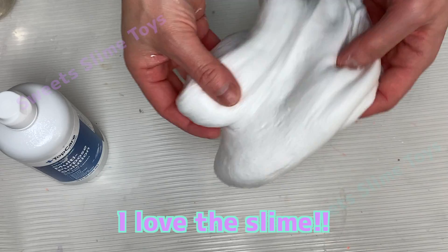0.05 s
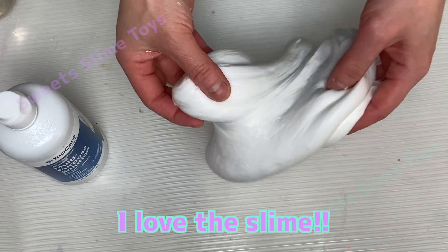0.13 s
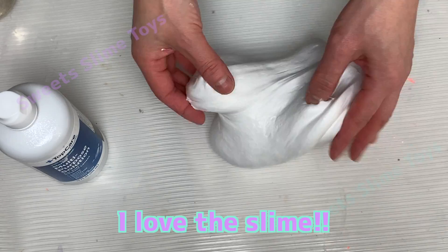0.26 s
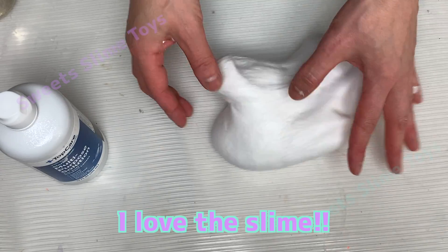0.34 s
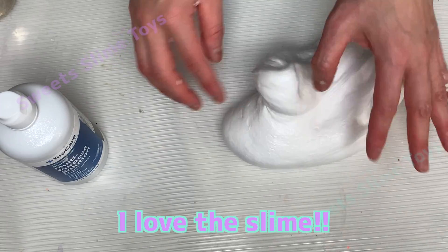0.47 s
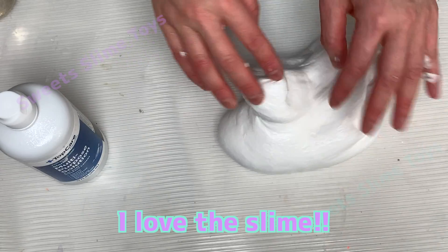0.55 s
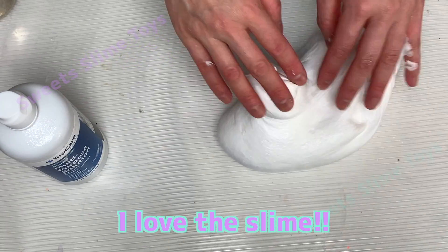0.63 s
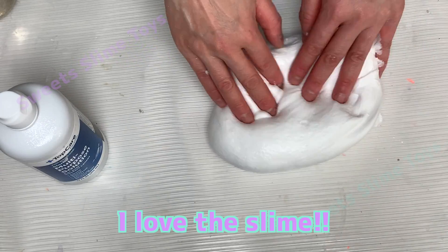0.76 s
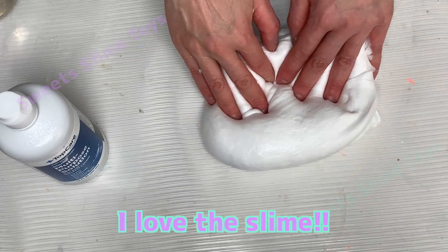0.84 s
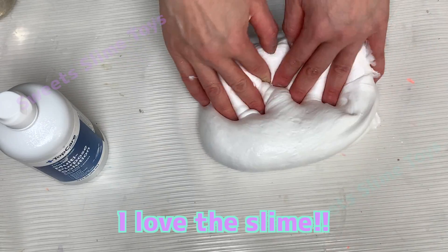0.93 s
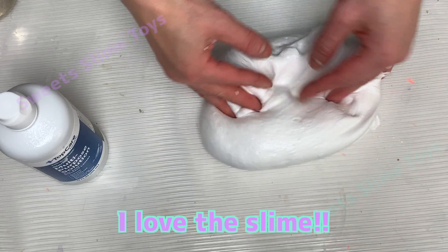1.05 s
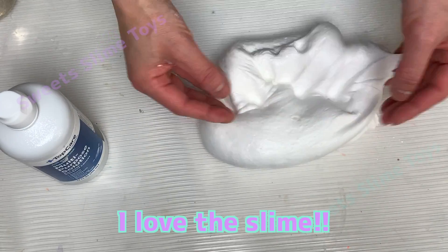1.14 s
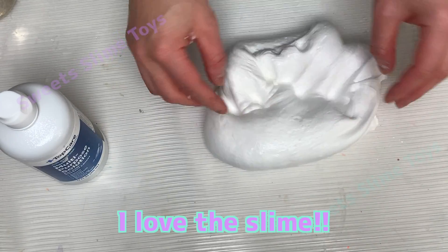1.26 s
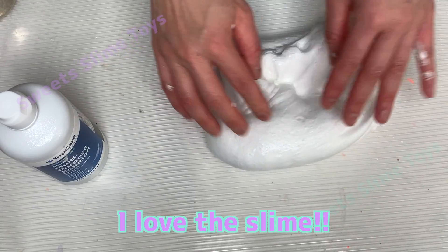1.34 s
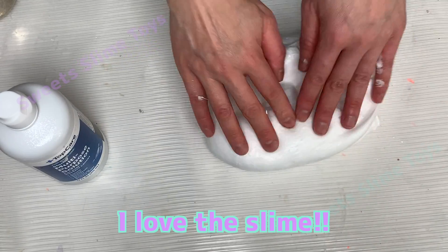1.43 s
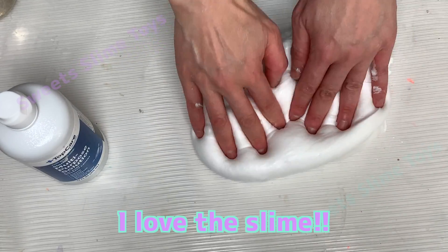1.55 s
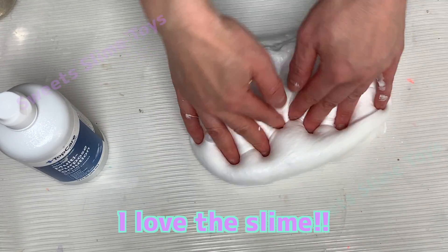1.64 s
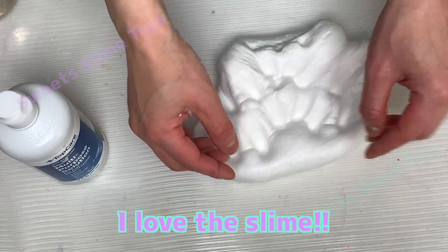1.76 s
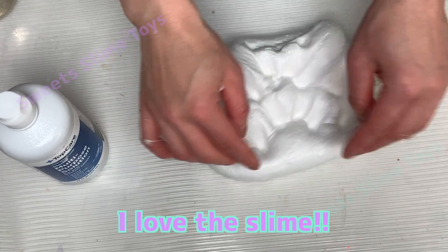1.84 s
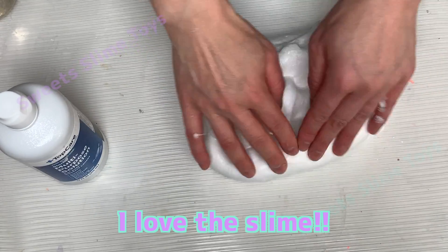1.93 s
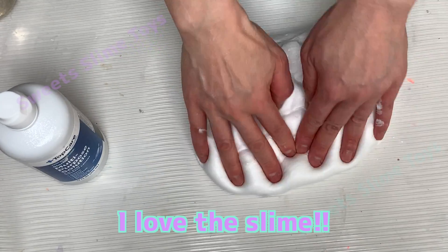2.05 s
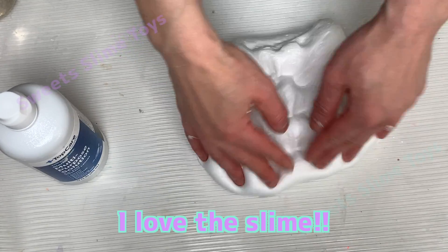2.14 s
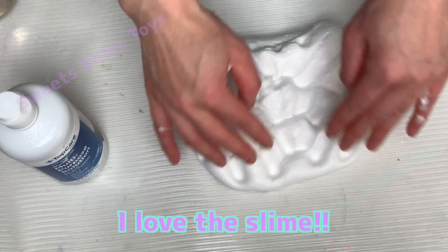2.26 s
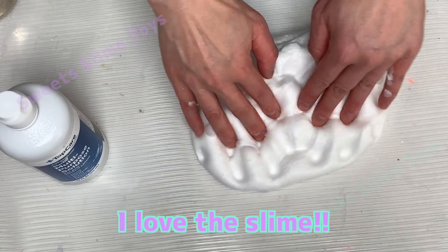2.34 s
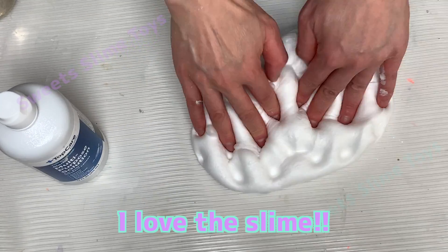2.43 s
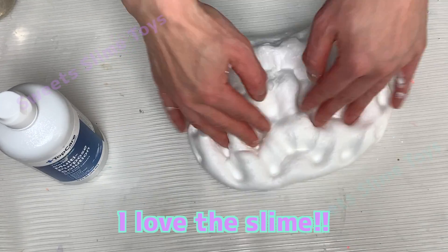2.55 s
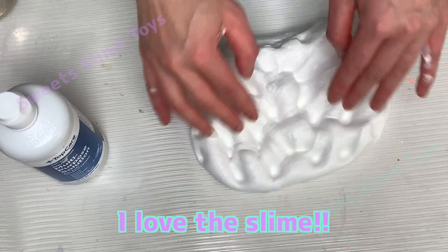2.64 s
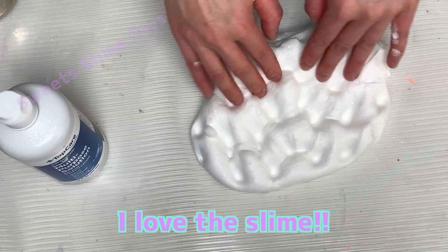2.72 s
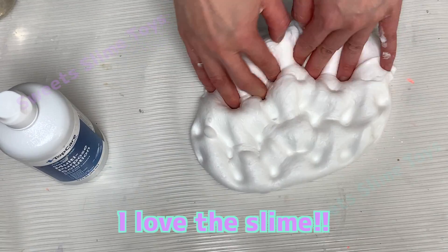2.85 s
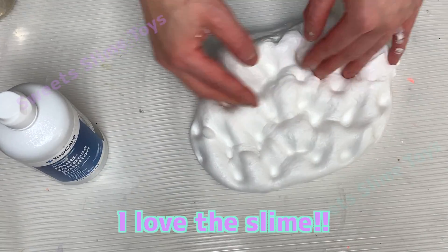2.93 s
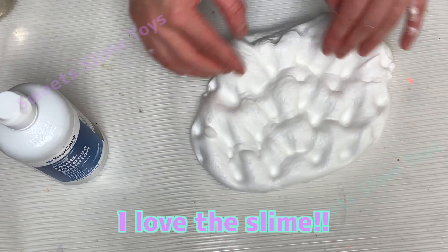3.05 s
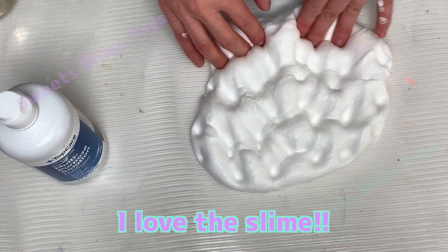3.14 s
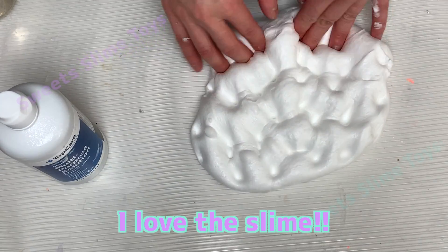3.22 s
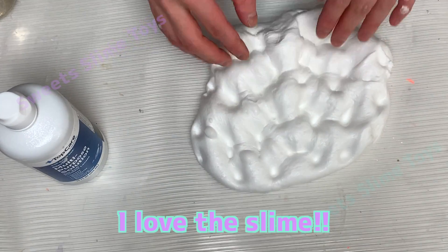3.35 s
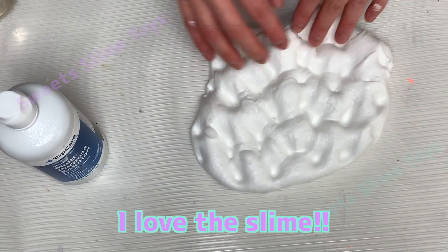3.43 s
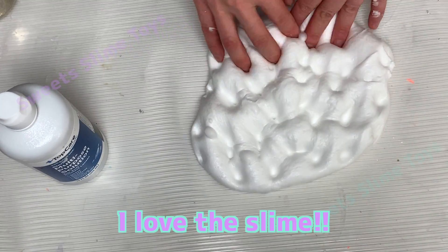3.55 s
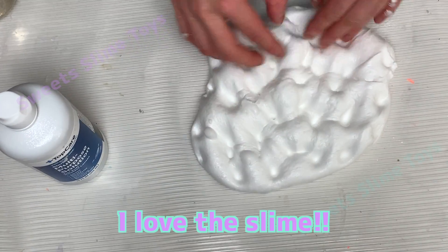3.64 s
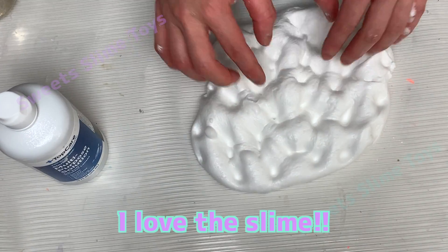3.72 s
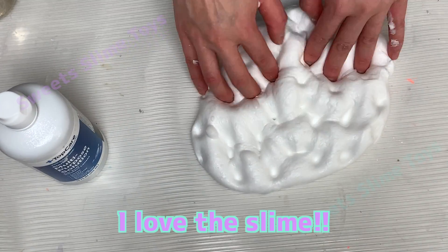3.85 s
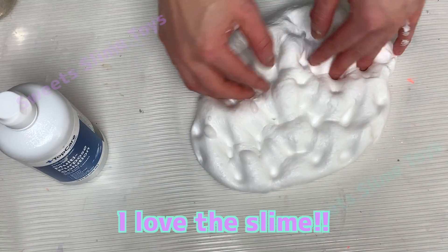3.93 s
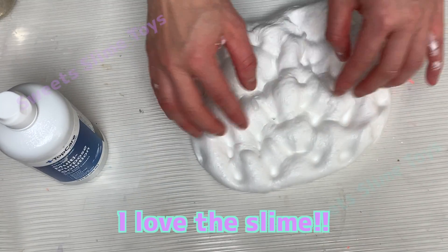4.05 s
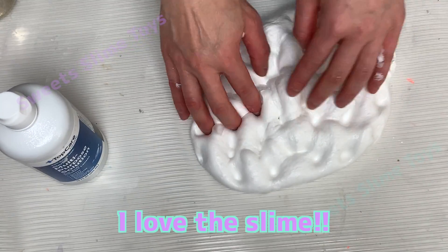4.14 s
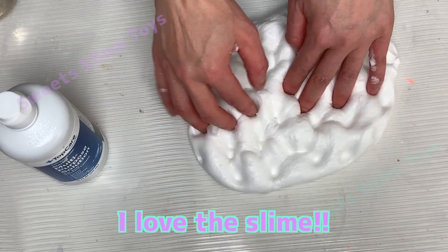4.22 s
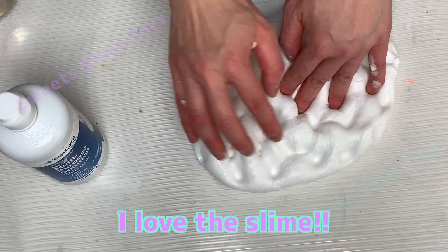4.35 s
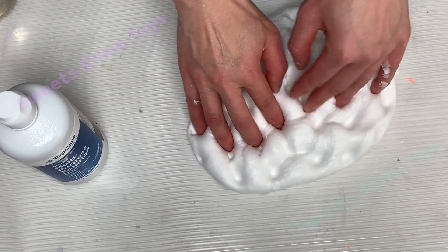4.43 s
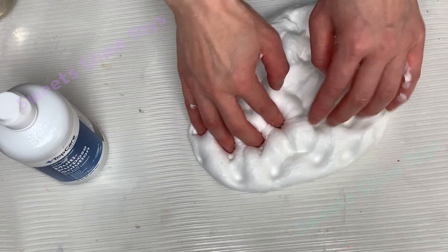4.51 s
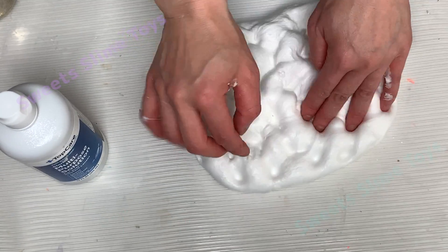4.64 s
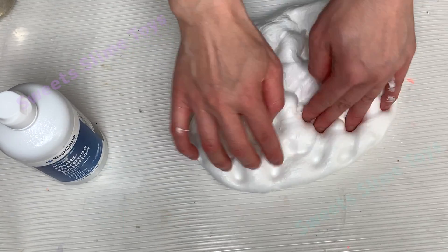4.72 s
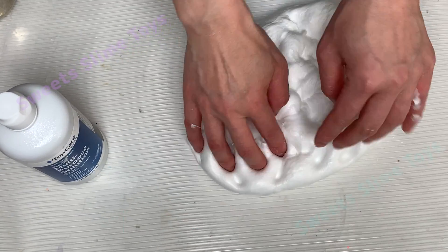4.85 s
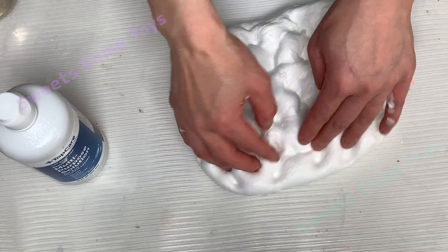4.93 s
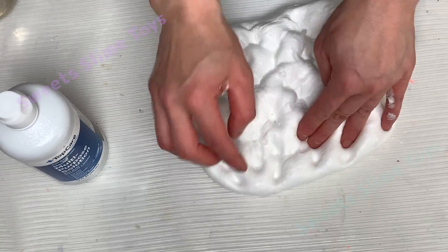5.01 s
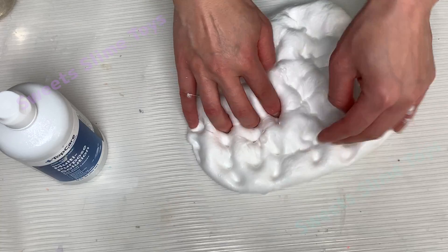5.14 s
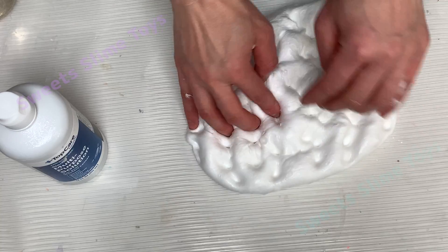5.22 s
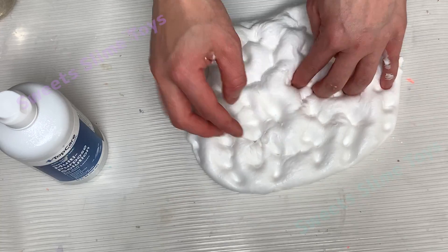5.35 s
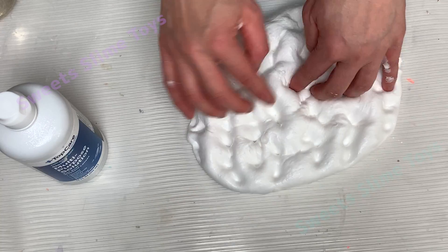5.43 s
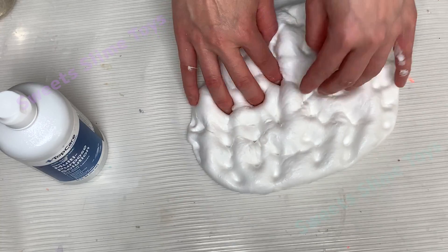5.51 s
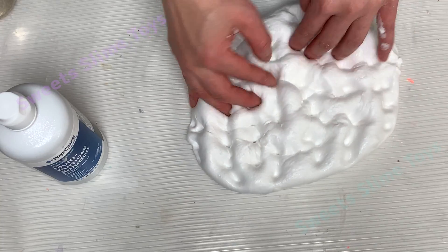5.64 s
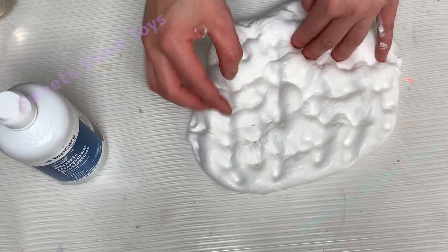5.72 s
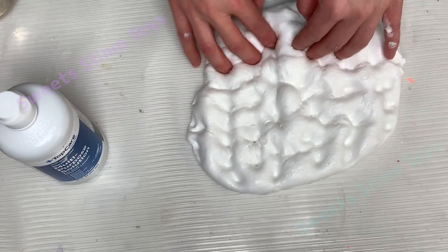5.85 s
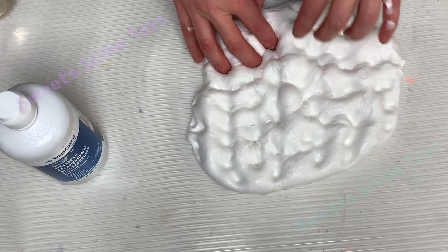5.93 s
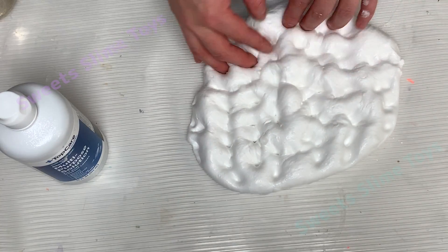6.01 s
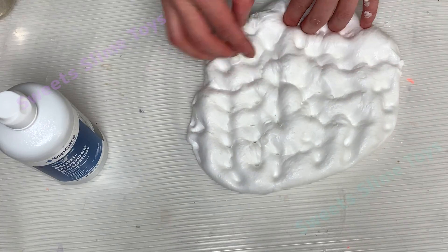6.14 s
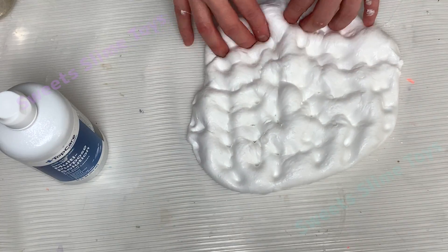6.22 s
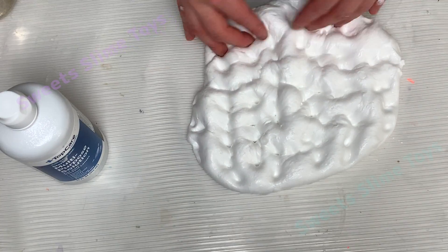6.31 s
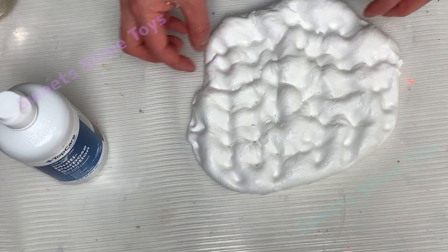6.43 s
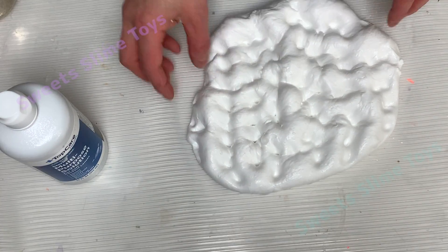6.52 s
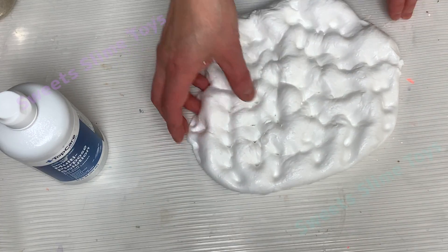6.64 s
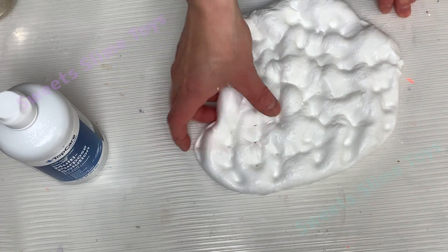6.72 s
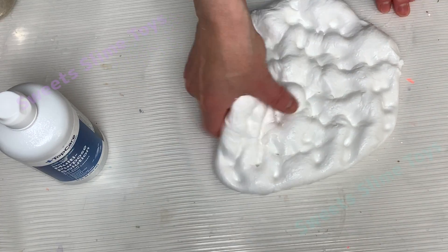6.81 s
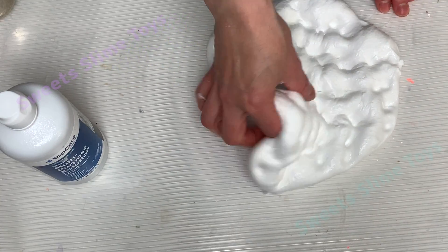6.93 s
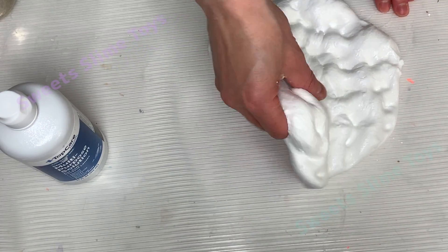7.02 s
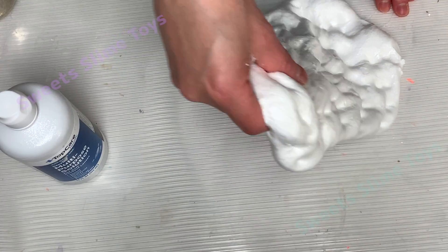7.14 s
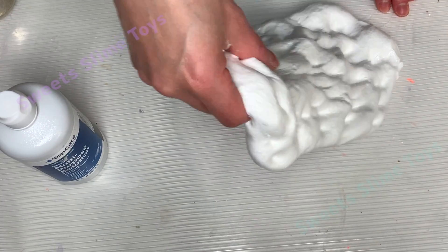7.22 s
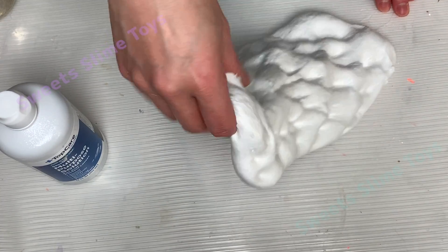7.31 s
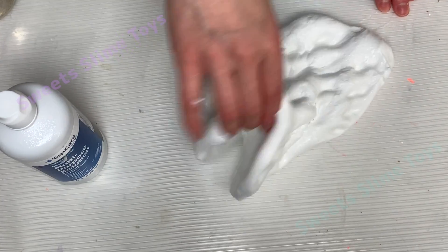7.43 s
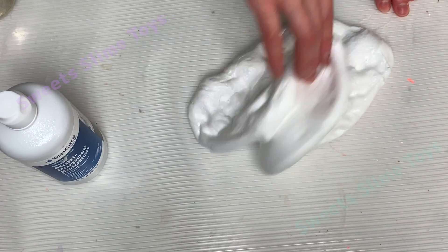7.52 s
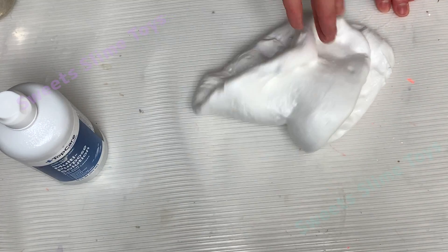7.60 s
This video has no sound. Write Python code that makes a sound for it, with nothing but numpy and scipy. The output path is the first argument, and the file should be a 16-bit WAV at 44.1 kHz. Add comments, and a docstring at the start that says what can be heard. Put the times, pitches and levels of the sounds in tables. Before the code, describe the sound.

Close, nearly mono sound of foam slime being kneaded. Isolated snaps give way to rapid pops and fizzy crackle in uneven pushes with brief quieter gaps, while fingertips knock dully on the table and a small hard object rings faintly now and then. The popping eases near the end into a soft peeling rustle, over faint room hiss.

```python
"""Fingers poke and knead foamy slime on a table in a small quiet room, close to a nearly mono microphone.
It starts with faint crackle and a few soft pops, then single loud ones; from about 2.5 s pops come thick and fast.
Each bursting air pocket is a short swinging snap plus a hollow pock; fine foam crackles as many tiny random bursts.
Pushes thud on the table as a knock and low dying sines, and a small hard object rings faintly on two high notes.
From 6.4 s the slime is peeled off and folded with softer crackle; room echo and filtered-noise hiss run throughout."""
import sys
import numpy as np
from scipy import signal
from scipy.fft import rfft, irfft, next_fast_len
from scipy.io import wavfile
from scipy.ndimage import uniform_filter1d

SR = 44100
rng = np.random.default_rng(int(sys.argv[2]) if len(sys.argv) > 2 else 0)


def master_out(mix):
    """Clip the mix to full scale and print it as 16-bit PCM to the path in sys.argv[1]."""
    frames = np.transpose(np.atleast_2d(mix))
    ceiling = np.clip(frames, -1, 1)
    pcm = np.round(ceiling * 32767).astype(np.int16)
    wavfile.write(sys.argv[1], SR, pcm)


N = 338247  # samples, about 7.7 s


def amp(db):
    """Turns decibels into a plain multiplier."""
    return 10 ** (np.asarray(db) / 20)


def evened(x):
    """Scales a signal to an average (RMS) strength of 1."""
    return x / np.sqrt(np.mean(x ** 2) + 1e-20)


def read(points, hz):
    """Reads a curve between its points, with pitch on a logarithmic scale."""
    point_hz, value = np.transpose(points)
    return np.interp(np.log(hz + 1), np.log(point_hz + 1), value)


def add(mix, start_s, sound):
    """Adds a sound into the mix at a given time."""
    part = mix[max(round(start_s * SR), 0):][:len(sound)]
    part += sound[:len(part)]


def coloured(x, points):
    """Filters by a curve of dB over Hz."""
    size = next_fast_len(len(x))
    gain = amp(read(points, np.fft.rfftfreq(size, 1 / SR)))
    return irfft(rfft(x, size) * gain, size)[:len(x)]


def ringing(modes, count):
    """Struck solids ring as a sum of dying sines; t60 is the time to fall by 60 dB."""
    t = np.arange(count) / SR
    return sum(amp(db - 60 * t / t60) * np.sin(2 * np.pi * hz * t) for hz, db, t60 in modes)


def burst(hz, turns, phase, count=700):
    """A few swings that swell softly and die away; the envelope peaks at 1 after the given turns."""
    swings = np.arange(count) / SR * hz
    envelope = (swings / turns * np.exp(1 - swings / turns)) ** 2.65
    return envelope * np.sin(2 * np.pi * (swings + phase))


# Louder air pockets bursting, levels before the filters.
# Columns: start_s, snap_db, snap_hz, pock_db, pock_hz, and for thick films swings_to_peak (turns)
POPS = [(.1453, -55, 2900, -47.5, 1060), (.152, -47, 5500, -47, 1240), (.236, -42, 3000, -46, 420),
        (.3452, -48, 3000, -45.5, 860), (.356, -44, 3500, -48, 600), (.7767, -8, 6000, -30, 690, .58),
        (0.8198, -32, 4800, -43.5, 570), (.9654, -36.5, 6360, -50, 457), (0.9835, -5, 4080, -17, 696, .66),
        (0.9968, -38.5, 4400, -28, 450), (1.0672, -33, 3360, -38.5, 450, .61),
        (1.196, -44, 4600, -50.5, 400), (1.2069, -45, 2300, -51, 536), (1.491, -31, 5950, -50, 1090),
        (1.6135, -15, 5540, -22.5, 580), (1.628, -38, 4400, -29, 517), (1.65, -29, 4600, -25.5, 655),
        (1.7312, -28.5, 6070, -43, 1030), (1.911, -44, 2900, -42, 527), (1.974, -33.5, 4840, -72, 1530),
        (2, -39, 4830, -74, 630), (2.076, -28, 5660, -31.5, 475), (2.094, -31, 6800, -37, 845),
        (2.136, -30.5, 4080, -33, 1280), (2.2934, -37, 5250, -38.5, 680), (2.3186, -37, 3400, -36.5, 640),
        (2.4804, -6, 5200, -18, 740), (2.4893, -17.5, 3600, -21.5, 745), (2.5026, -13, 2870, -11.5, 780),
        (2.5211, -16.5, 4160, -23, 1130, .42), (2.5696, -22, 6040, -50, 1080),
        (2.578, -19, 6800, -42, 765, .77), (2.701, -47, 4470, -39.5, 517), (2.7159, -27.5, 6340, -51, 680),
        (2.8491, -15.5, 4300, -20, 547, .4), (2.8651, -16.5, 5770, -15.5, 670),
        (2.88, -30, 2700, -24.5, 460), (2.898, -27, 3700, -24, 617), (2.935, -25.5, 5000, -38, 656),
        (2.9471, -26.5, 2720, -42, 670), (3.0771, -25, 4350, -37, 1380), (3.0989, -29.5, 8050, -47.5, 1220),
        (3.1918, -47, 2880, -40, 1470), (3.2448, -25, 4060, -19.5, 490), (3.253, -12, 3260, -14.5, 1350),
        (3.2553, -40, 2700, -23, 640), (3.2796, -16, 5460, -22.5, 610), (3.292, -18.5, 3330, -49, 600),
        (3.3381, -27, 7500, -31.5, 880), (3.3424, -20.5, 6800, -35, 840), (3.362, -28, 3300, -34, 1530),
        (3.4449, -25, 2650, -41, 840), (3.4549, -32, 4500, -34.5, 420), (3.5298, -35.5, 3130, -49, 720),
        (3.5643, -21.5, 6040, -23, 680), (3.5883, -26, 2220, -26, 570), (3.6358, -32.5, 3660, -36, 900),
        (3.7541, -22, 5770, -37, 536), (3.7699, -41, 2210, -36, 1190), (3.8121, -37, 4330, -57, 580),
        (3.869, -30, 4960, -36, 530), (3.8914, -15.5, 4760, -24.5, 690), (3.921, -27, 2500, -24, 610, .45),
        (3.9437, -26, 6440, -23, 630), (3.996, -22, 3130, -61, 680), (4.0557, -37, 4400, -36, 925),
        (4.062, -37, 2340, -33.5, 470), (4.2017, -23, 7840, -18.5, 670), (4.226, -19.5, 2480, -38, 680),
        (4.2377, -15, 8650, -19.5, 740), (4.2698, -26, 8000, -37, 580), (4.289, -29, 5530, -49, 990),
        (4.3611, -38, 3200, -33.5, 1110), (4.3877, -5.5, 5560, -32, 507), (4.3911, -10.5, 2880, -27.5, 710),
        (4.3954, -18, 3000, -18.5, 680), (4.4124, -20, 3200, -23.5, 800), (4.4688, -22, 2900, -56, 780),
        (4.516, -12, 5000, -32, 690, .43), (4.542, -5, 6000, -18.5, 880), (4.5435, -10.5, 4420, -26, 1090),
        (4.558, -49, 5400, -29, 1110), (4.5723, -25, 5700, -35, 1170), (4.576, -9.5, 3700, -13.5, 1000),
        (4.5797, -41, 2400, -25.5, 940), (4.7121, -39, 4300, -41, 677), (4.737, -26, 6400, -31.5, 605),
        (4.755, -33, 3100, -31.5, 635), (4.7685, -27.5, 3780, -35.5, 700), (4.8158, -26.5, 3080, -50, 1130),
        (4.8905, -14.5, 3880, -16.5, 855), (4.899, -18, 2500, -34.5, 900),
        (4.9144, -7.5, 6200, -13.5, 1210), (4.9154, -9, 2830, -24, 1080),
        (4.9402, -3.5, 8300, -12, 1140, .61), (4.944, -21, 7200, -44, 980), (4.9855, -32, 4200, -27, 1170),
        (5.0548, -44, 2880, -31, 650), (5.0733, -18.5, 4100, -24.5, 606, .41),
        (5.0771, -8, 8140, -18.5, 740, .74), (5.0833, -16, 3470, -19, 820), (5.103, -26.5, 4200, -23, 1050),
        (5.1491, -28, 3150, -50, 870), (5.231, -20, 2440, -24, 890), (5.2596, -12, 3980, -16.5, 710, .4),
        (5.2883, -9, 4700, -22, 1540, .43), (5.4316, -34, 3670, -27.5, 880),
        (5.4448, -17.5, 4540, -27, 607), (5.4572, -21, 3900, -24.5, 647), (5.4642, -18, 3520, -31.5, 1020),
        (5.4758, -18, 3740, -31, 1440, .57), (5.4844, -27, 4530, -37, 1110, .7),
        (5.5127, -25, 3300, -56, 1050), (5.5311, -31, 6400, -60, 990), (5.568, -46, 3900, -28.5, 875),
        (5.6012, -28, 2700, -20, 700), (5.6117, -10, 8400, -24, 596, .66), (5.615, -22, 8700, -22, 624),
        (5.6322, -10.5, 7400, -16.5, 810, 1.2), (5.6362, -26, 7000, -17.5, 1150, .77),
        (5.6627, -4, 7750, -14.5, 806), (5.6765, -26, 7560, -35, 795), (5.7975, -44.5, 2600, -27, 563),
        (5.802, -28, 3520, -20, 824), (5.8046, -25, 2800, -24, 585), (5.826, -34, 2780, -27, 716),
        (5.8322, -9, 7250, -18.5, 607), (5.847, -17.5, 2900, -25.5, 620), (5.85, -20, 2900, -29, 644),
        (5.8745, -31.5, 5000, -41.5, 770), (5.9045, -18.5, 4500, -48, 890), (5.9737, -15, 3440, -22, 680),
        (5.9944, -21.5, 3350, -46.5, 480), (5.9995, -2.5, 4130, -21, 770), (6.0057, -17.5, 2480, -20, 565),
        (6.0373, -11, 5300, -15.5, 1530), (6.1598, -24.5, 3180, -29.5, 590, .56),
        (6.1653, -33, 4130, -30, 875, .48), (6.242, -13.5, 5600, -16, 660),
        (6.273, -25, 3300, -28.5, 633, .42), (6.292, -18.5, 2600, -24, 770, .53),
        (6.311, -25, 4300, -22.5, 640), (6.3486, -21.5, 2800, -28, 624), (6.3586, -24, 3530, -34, 765),
        (6.5156, -40, 3780, -36.5, 1360), (6.5232, -34.5, 3630, -40, 790), (6.588, -37.5, 2600, -61, 920),
        (6.688, -24.5, 3220, -24.5, 1540), (6.7237, -43, 2300, -40, 1160), (6.7943, -59, 2400, -32, 930),
        (6.897, -23, 2100, -31.5, 610), (7.0197, -42, 2700, -46, 870), (7.049, -41, 2900, -44, 1080),
        (7.107, -43, 3760, -47, 1040), (7.3127, -37, 2600, -43, 750), (7.3525, -42, 5400, -60, 560),
        (7.394, -42, 2750, -54, 698), (7.411, -46, 5360, -56, 830), (7.4924, -42, 4700, -44, 607),
        (7.55, -29, 2270, -38, 856)]
# Table top shaken by a pock: pitch_hz, level_db, t60_s
BOARD = [(575, -21, 0.04), (600, -36, 0.22), (930, -29, 0.02), (1323, -30, 0.02)]
# A small hole radiates bass poorly: pitch_hz, level_db
HOLE = [(100, -13.5), (250, -10), (450, -1), (3000, 3)]
TEAR_S, FEWEST_SWINGS = .00006, 0.21  # a snap swells while the film tears
ECHO_S, ECHO_SNAP_DB, ECHO_POCK_DB, ECHO_PITCH = 0.002606, -16, -15, 0.8


def pops():
    """The film tears with a snap; the hole behind it answers with a pock that also shakes the table top."""
    snaps, pocks = np.zeros(N), np.zeros(N)
    # each of these pops is answered 2.6 ms later by a weaker echo with a lower pock
    echoes = [(s + ECHO_S, snap_db + ECHO_SNAP_DB, snap_hz, pock_db + ECHO_POCK_DB, pock_hz * ECHO_PITCH)
              for s, snap_db, snap_hz, pock_db, pock_hz, *_ in POPS]
    every = POPS + echoes + small_pops()
    chance = rng.random((len(every), 4))
    noise = rng.standard_normal((len(every), 2, 600))
    t = np.arange(600) / SR
    lead_s = .003
    swell = np.where(t < lead_s, np.exp((t - lead_s) / 0.0013), np.exp((lead_s - t) / 0.0028))
    flap_fade = np.exp(-t / 0.0013)
    for pop, (phase, luck, *gaps), (edge, puff_noise) in zip(every, chance, noise):
        s, snap_db, snap_hz, pock_db, pock_hz, *thick = pop
        turns = max(TEAR_S * snap_hz, FEWEST_SWINGS, *thick)
        snap = burst(snap_hz, turns, phase, count=300)
        add(snaps, s, amp(snap_db) * snap)
        # the widening rim answers twice; the later the answer, the lower and weaker
        for gap in gaps:
            answer = burst(snap_hz * (1.25 - 0.59 * gap), turns + 0.24, phase=luck, count=300)
            add(snaps, s + .00012 + .0007 * gap, amp(snap_db - 5 - 4 * gap) * answer)
        # the torn edge flaps on
        flapping = np.convolve(snap, 0.063 * edge * flap_fade)
        add(snaps, s, amp(snap_db) * flapping)
        puff = np.convolve(puff_noise * swell, burst(snap_hz, turns=0.2, phase=phase, count=60))
        add(snaps, s - lead_s, amp(puff_db(snap_db)) * puff)
        add(pocks, s, amp(pock_db) * burst(pock_hz, turns=0.72, phase=0.36 + 0.17 * luck))
    snaps, pocks = coloured(snaps, HOLE), coloured(pocks, HOLE)
    board = ringing(BOARD, count=5000) * 2 * np.pi * 600 / SR
    return snaps + pocks + signal.oaconvolve(pocks, board)[:N]


def puff_db(snap_db):
    """A soft puff of noise swells and fades around each pop; it grows less than the snap does."""
    return .6 * snap_db - 33.5


SMALL_POPS = 200
# highest levels over the crackle level, and how far below they scatter
SMALL_SNAP_DB, SMALL_POCK_DB, SMALL_SPREAD_DB = 11.5, 9.5, 11
PEEL_POP_DB = -10  # peeling pops less than squeezing


def small_pops():
    """Lesser pockets burst at random moments, as loud as the kneading is hard."""
    when, snap_luck, pock_luck, snap_pitch, pock_pitch = rng.random((SMALL_POPS, 5)).T
    s = when * N / SR
    times, level_db, _ = kneading()
    db = np.interp(s, times, level_db) + PEEL_POP_DB * (s > PEELING[0][0])
    snap_db = db + SMALL_SNAP_DB - SMALL_SPREAD_DB * snap_luck
    pock_db = db + SMALL_POCK_DB - SMALL_SPREAD_DB * pock_luck
    snap_hz = 2400 * (7500 / 2400) ** snap_pitch
    pock_hz = 503 * (1300 / 503) ** (pock_pitch ** 2)  # low pocks are likelier
    return list(zip(s, snap_db, snap_hz, pock_db, pock_hz))


# Colour of the fine foam crackle: pitch_hz, level_db (per Hz)
CRACKLE = [(120, -36), (200, -6), (250, -21), (349, -3.5), (376, -15.5), (633, 0), (5170, -8), (6300, -13),
           (13900, -22), (17000, -34)]
CRACKLES_PER_S, CRACKLE_SPREAD_DB = 9700, 3.5
PEEL_GRAIN = .45  # share of unevenness left while peeling, whose crackle is more even


def crackle():
    """Tiny cells burst at random, in clumps; pitch and size differ from cell to cell."""
    times, level_db, tilt_db = kneading()
    t, out = np.arange(N) / SR, np.zeros(N)
    uneven = np.where(t > PEELING[0][0], PEEL_GRAIN, 1)
    drift = evened(uniform_filter1d(rng.standard_normal(N), 300))
    clumps = amp(2.5 * uneven * drift)
    spread = uneven * np.minimum(rng.exponential(1, N), 5) + 2 * (1 - uneven)
    bursting = rng.random(N) < CRACKLES_PER_S / SR
    size = amp(CRACKLE_SPREAD_DB * spread) * bursting
    pitches = np.geomspace(350, 15000, 20)
    cell = rng.integers(0, len(pitches), N)
    tilt = np.interp(t, times, tilt_db)
    for k, hz in enumerate(pitches):
        grain = burst(hz, turns=1.0, phase=rng.random())
        # pitches are spaced by ratio, so higher ones each cover more Hz
        grain *= amp(read(CRACKLE, hz)) * np.sqrt(hz) / np.linalg.norm(grain)
        brightness = amp(tilt * np.log2(hz / 4000) / 3)
        hits = size * clumps * (cell == k) * brightness
        out += signal.oaconvolve(hits, grain)[:N]
    return evened(out) * amp(np.interp(t, times, level_db))


# Fingers squeezing the foam; start_s is when the rise is complete.
# Columns: start_s, hold_s, crackle_db, tilt_db (dull to bright, over three octaves)
PRESSES = [(0, 0.065, -65.5, 5.5), (0.127, .05, -64.5, 2.5), (.19, .03, -64, 6), (.225, .03, -56, 3.5),
           (0.324, 0.046, -64.5, 0.5), (.787, .02, -50.5, 1.5), (0.942, 0.024, -60, 7),
           (0.982, 0.065, -49.5, 2.5), (1.086, 0.036, -60.5, 3.5), (1.4, .05, -68, -2),
           (1.46, .05, -61, -1), (1.557, 0.048, -62, 5.5), (1.611, 0.083, -50, 1.5), (1.904, .12, -66, 2),
           (2.07, 0.068, -53, 2.5), (2.29, 0.027, -61.5, -0.5), (2.358, 0.033, -67.5, -0.5),
           (2.43, 0.03, -60, 6.5), (2.479, 0.086, -48.5, -2.5), (2.685, .06, -63, -3),
           (2.858, .05, -44, -6), (2.932, 0.024, -53.5, 2.5), (3.064, 0.04, -62, -4.5),
           (3.194, 0.033, -60.5, -1.5), (3.244, .06, -47, -1), (3.324, 0.026, -47, 0),
           (3.433, 0.045, -57, -0.5), (3.523, 0.016, -55.5, 4), (3.566, 0.044, -51, -6.5),
           (3.741, .08, -61, 1.5), (3.891, 0.05, -51, -5.5), (3.981, 0.044, -57, -0.5),
           (4.046, 0.021, -56, -6.5), (4.16, .03, -65, -4), (4.201, 0.064, -47, -0.5), (4.34, .03, -62, 0),
           (4.385, .05, -44.5, 4), (4.462, 0.033, -55, 3), (4.523, 0.11, -54.5, 3.5),
           (4.711, 0.087, -50.5, 1), (4.891, 0.096, -49.5, -3.5), (5.07, 0.056, -48.5, 1.5),
           (5.231, 0.077, -50.5, 0), (5.419, .1, -50, -1), (5.602, 0.097, -49, 2.5),
           (5.797, 0.071, -47, -1.5), (5.885, .03, -55.5, 2.5), (5.974, 0.11, -53, 4.5),
           (6.15, 0.023, -53, -3.5), (6.243, 0.062, -49, 2), (6.335, 0.025, -49, -3.5),
           (7.475, 0.089, -56.5, 3.5)]
# The sheet of slime is peeled off the table and folded: time_s, crackle_db
PEELING = [(6.4, -83), (6.47, -72), (6.53, -64.5), (6.7, -58.5), (6.85, -61), (6.95, -55), (7.06, -52.5),
           (7.2, -57), (7.26, -65), (7.31, -59), (7.37, -65), (7.44, -66.5), (7.67, -76)]
ATTACK_S, RELEASE_DB_PER_S = 0.018, 261
SETTLING_DB, SETTLING_TILT_DB = -75, 5  # the foam never stops fizzing faintly


def kneading():
    """Crackle level and tilt in dB: each press rises, holds and dies away; peeling runs under them."""
    t = np.arange(0, N + 64, 64) / SR
    start, hold, db, tilt_db = np.transpose(PRESSES)[:, :, None]
    rise = np.clip((t - start) / ATTACK_S + 1, 0, 1) ** 4
    fall_db = RELEASE_DB_PER_S * np.maximum(t - start - hold, 0)
    power = amp(2 * (db - fall_db)) * rise  # doubled dB gives power
    peeling = amp(2 * np.interp(t, *np.transpose(PEELING), left=-100))
    settling = amp(2 * SETTLING_DB)
    total = power.sum(0) + peeling + settling
    tilt = ((power * tilt_db).sum(0) + settling * SETTLING_TILT_DB) / total
    return t, 10 * np.log10(total), tilt


# Fingertips pushing through to the table: start_s, knock_db, boom_db
THUDS = [(.234, -38, -54), (.776, -47.5, -54.5), (.984, -41, -60.5), (1.611, -44, -53), (1.654, -44, -49),
         (2.077, -50, -62.5), (2.107, -52, -54), (2.14, -45.5, -53), (2.318, -45.5, -59),
         (2.502, -41.5, -50.5), (2.556, -43, -47), (2.864, -35, -63), (2.927, -50, -52.5),
         (3.069, -50.5, -50), (3.25, -44, -52), (3.297, -53, -58), (3.339, -47, -48.5), (3.453, -49, -66),
         (3.585, -44.5, -65), (3.768, -46, -55.5), (3.92, -45, -57), (4.057, -40, -49), (4.166, -49, -60),
         (4.199, -46, -55), (4.269, -49, -48), (4.376, -40.5, -44), (4.559, -36, -50.5),
         (4.731, -38.5, -47), (4.894, -37, -44.5), (5.091, -30, -42.5), (5.124, -50.5, -53),
         (5.231, -43, -55), (5.268, -38.5, -46), (5.436, -49, -49), (5.572, -36, -58.5),
         (5.625, -31.5, -50), (5.795, -39, -46.5), (5.829, -41.5, -59), (6.005, -37, -44.5),
         (6.039, -57, -55), (6.163, -46.5, -47), (6.287, -48, -50), (6.351, -42.5, -47.5),
         (6.521, -51, -71), (6.894, -45.5, -48)]
# Low notes of the table, at their strongest: pitch_hz, level_db, t60_s
TABLE_MODES = [(79.4, 2.5, 0.23), (94.8, -4.5, 0.27), (130, -11.5, 0.3)]


def thuds():
    """A blunt knock of the fingertips; the table booms after it in its low modes."""
    out, t = np.zeros(N), np.arange(12000) / SR
    swell = 1 - np.exp(-t / 0.0027)
    chances = rng.random((len(THUDS), 2 + len(TABLE_MODES)))
    for (s, knock_db, boom_db), (spot, phase, *lucks) in zip(THUDS, chances):
        knock_hz = 185 + (265 - 185) * spot  # varies with the spot hit
        add(out, s, amp(knock_db) * burst(knock_hz, turns=0.8, phase=phase, count=3000))
        # each spot moves the modes differently
        modes = [(hz, db - 7.3 * luck, t60) for (hz, db, t60), luck in zip(TABLE_MODES, lucks)]
        add(out, s, amp(boom_db) * ringing(modes, count=12000) * swell)
    return out


# The small hard object is jolted: start_s, lower_mode_db, upper_over_lower_db, length_s
JOLTS = [(3.338, -54, 6, .07), (4.575, -54, 0, .04), (5.476, -39.5, 1.5, .07), (5.664, -47, -6, .04),
         (5.71, -58, -12, .075), (6.02, -54, 4, .03), (6.358, -47, -12, .035)]
OBJECT_HZ = (4342, 5103)  # lower and upper mode


def jolts():
    """Two thin high modes ring unevenly while the object chatters on the table, then it is damped."""
    out = np.zeros(N)
    chatter = uniform_filter1d(rng.standard_normal((len(JOLTS), 2, 4000)), 200, axis=2)
    for (s, db, upper_db, length), shake in zip(JOLTS, chatter):
        t = np.arange(min(round(length * SR), 4000)) / SR
        modes = amp([[db], [db + upper_db]]) * np.sin(2 * np.pi * np.outer(OBJECT_HZ, t))
        uneven = 1 + 0.35 * evened(shake)[:, :len(t)]
        fade = signal.windows.tukey(len(t), .6) * amp(-12 * t / length)
        add(out, s, (modes * uneven).sum(0) * fade)
    return out


# How long the room rings: pitch_hz, t60_s
ROOM = [(200, .3), (530, 0.24), (1400, 0.18), (3700, 0.25), (9700, 0.21), (16000, 0.053)]


def tail():
    """Sparse taps of random sign, each band dying at its own speed; energy 1."""
    taps = np.zeros(SR // 2)
    at = np.arange(60, len(taps) - 12, 12)
    taps[at + rng.integers(0, 12, len(at))] = rng.choice([-1., 1.], len(at))
    hz, t, bands = signal.stft(taps, SR, nperseg=128)
    t60 = read(ROOM, hz)[:, None]
    dying = bands * amp(-60 * t / t60) / np.sqrt(t60)
    out = signal.istft(dying, SR, nperseg=128)[1]
    return out / np.linalg.norm(out)


# Reflections off hands, table and walls: delay_ms, level_db
BOUNCES = [(1.5, -26.5), (2.6, -40.5), (4.6, -21), (7.5, -39)]
# Colour of the tail, against the direct sound: pitch_hz, level_db
ROOM_COLOUR = [(200, -4), (600, -11.5), (2000, -9), (5000, -13.5), (10000, -14.5), (16000, -7)]
# Filter on the tail's side signal: pitch_hz, level_db
ROOM_SIDE = [(80, -9), (180, -17.5), (300, -6), (400, 2.5), (480, -13.5), (2000, -24), (8000, -12),
             (15000, -28.5)]


def room(x):
    """Near bounces and a diffuse tail, as mid and side; three tails take turns so that pops ring differently."""
    early = np.zeros(600)
    for ms, db in BOUNCES:
        early[round(ms * SR / 1000)] = amp(db)
    turn = np.arange(N) / SR * 2 * np.pi * 5.3
    shares = [np.sqrt(2 / 3) * np.cos(turn + 2 * np.pi * k / 3) for k in range(3)]

    def diffuse():
        """Echo through three fresh tails, each fed by its changing share of the sound."""
        return coloured(sum(signal.oaconvolve(x * share, tail())[:N] for share in shares), ROOM_COLOUR)

    mid, side = diffuse(), diffuse()
    return mid + signal.oaconvolve(x, early)[:N], coloured(side, ROOM_SIDE)


# Colour of room and microphone hiss: pitch_hz, level_db (per Hz)
AIR = [(12, -46), (20, -19.5), (44, -4.5), (58, -18), (92, -8), (109, -15.5), (129, -15), (197, -14.5),
       (300, -19), (387, -19), (543, -23), (929, -26.5), (14800, -38.5), (17000, -56)]
# Side of the hiss against its mid: pitch_hz, level_db
AIR_SIDE = [(60, -13.5), (110, -17.5), (200, -16), (380, -9.5), (700, -20.5), (1290, -16.5), (2380, -35),
            (4400, -28.5), (8120, -17), (15000, -16)]
AIR_DB = -66.5  # RMS of the mid, before the microphone's colour


def air():
    """Steady hiss and rumble of the quiet room, made of filtered noise, as mid and side."""
    mid, side = (coloured(white, AIR) for white in rng.standard_normal((2, N)))
    gain = amp(AIR_DB) / np.std(mid)
    return gain * mid, gain * coloured(side, AIR_SIDE)


# Direct sound in the side signal: pitch_hz, level_db
PORTS = [(80, -11.5), (180, -20), (300, -14), (400, -22.5), (480, -32), (2000, -33.5), (8000, -20),
         (14000, -22)]


def scene():
    """Adds the slime sounds, their echo and the hiss, then turns mid and side into two channels."""
    slime = pops() + crackle() + thuds() + jolts()
    (wet, wet_side), (hiss, hiss_side) = room(slime), air()
    # the two microphone ports differ in phase, not in level: a quarter-turn shift goes into the side
    skew = signal.hilbert(slime, next_fast_len(N)).imag[:N]
    mid = slime + wet + hiss
    side = wet_side + hiss_side + coloured(skew, PORTS)
    return np.array([mid + side, mid - side])


# Colour of the microphone: pitch_hz, level_db
MIC = [(20, -26), (40, -6.5), (70, 1), (3000, -2), (4800, -1.5), (6200, -4.5), (8000, -1.5), (12000, 0),
       (15000, 0.5), (17000, -9)]
EDGE_HZ = 16600  # upper band limit


def record(dry):
    """Colour of the microphone, then the band limit."""
    heard = np.array([coloured(x, MIC) for x in dry])
    low_pass = signal.firwin(255, EDGE_HZ, window=("kaiser", 9), fs=SR)
    return signal.oaconvolve(heard, low_pass[None], "same")


dry = scene()
out = record(dry)
master_out(out)
```